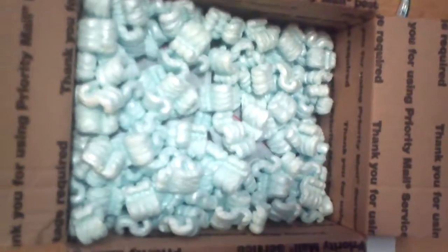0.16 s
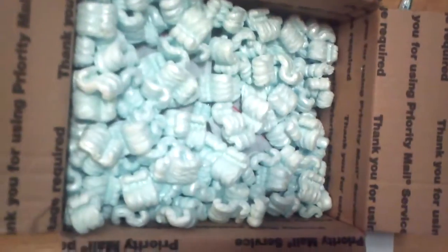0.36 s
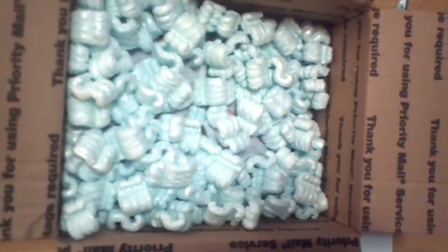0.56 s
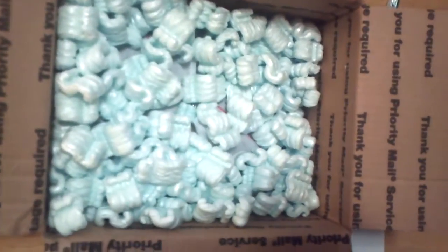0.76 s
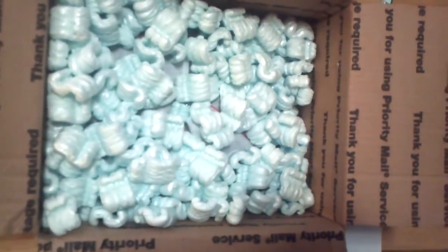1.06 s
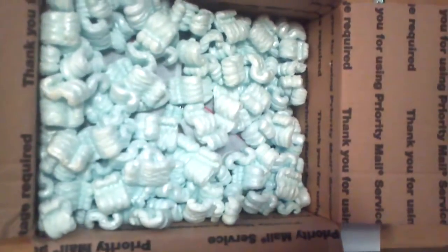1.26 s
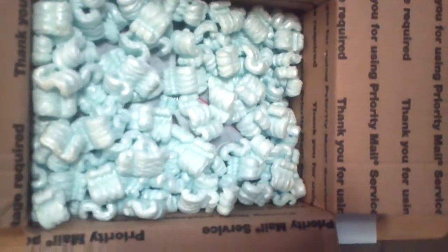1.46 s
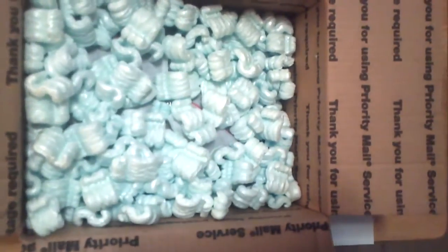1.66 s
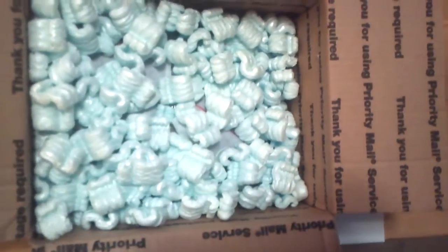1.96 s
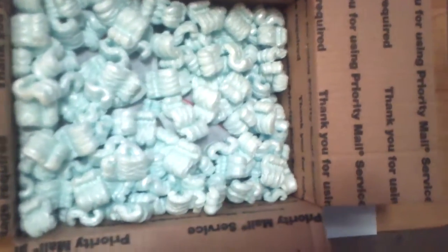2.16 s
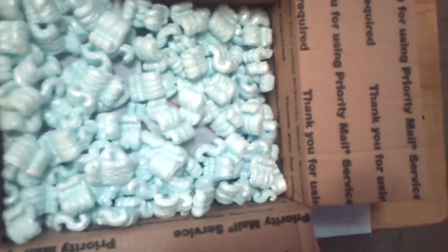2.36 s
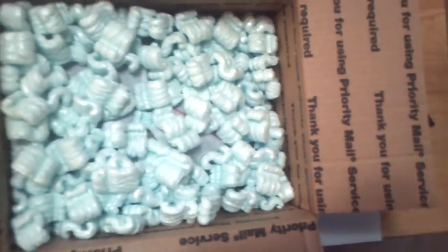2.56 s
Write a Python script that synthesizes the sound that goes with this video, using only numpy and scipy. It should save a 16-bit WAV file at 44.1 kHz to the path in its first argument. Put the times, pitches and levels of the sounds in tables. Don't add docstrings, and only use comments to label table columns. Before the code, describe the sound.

Foam packing peanuts rustle in a cardboard box: a faint start, a loud crackling swell with a dull knock, then smaller uneven shuffles and ticks, more box bumps near the end; close stereo microphone, quiet room.

```python
import sys
import numpy as np
from scipy import signal
from scipy.fft import rfft, irfft, next_fast_len
from scipy.io import wavfile
from scipy.ndimage import uniform_filter1d

SR = 44100
rng = np.random.default_rng(int(sys.argv[2]) if len(sys.argv) > 2 else 0)


def pcm_store(signal):
    levels = np.round(np.clip(np.atleast_2d(signal), -1, 1) * 32767)
    wavfile.write(sys.argv[1], SR, levels.astype(np.int16).T)


def how_loud(loudness_db):
    steps = np.asarray(loudness_db, float) / 20
    return 10 ** steps


N = 119070

# [start_s, rise_s, hold_s, level_db, release_t60_s]
PUSHES = [(0, 0.00027, 0.033, -53.5, 0.17), (0.184, 0.073, 0.006, -51, 0.045),
          (0.275, 0.046, 0.14, -36, 0.16), (0.454, .005, 0.054, -64, 0.43),
          (0.492, 0.0073, 0.1, -46.5, 0.48), (0.696, 0.021, 0.036, -54.5, 0.12),
          (0.776, 0.013, 0.086, -75, 0.058), (0.874, 0.0012, 0.046, -46, 0.095),
          (0.94, 0.044, 0.063, -50, 0.09), (1.137, 0.0078, 0.029, -51.5, 0.12),
          (1.168, 0.016, 0.024, -46.5, 0.1), (1.31, 0.033, 0.037, -60, 0.073),
          (1.485, 0.013, 0.04, -47, 0.42), (1.57, 0.0089, 0.17, -46.5, 0.21),
          (1.857, 0.00086, 0.059, -49.5, 0.32), (1.963, 0.0087, 0.047, -50.5, 0.067),
          (2.042, 0.003, 0.035, -50, 0.15), (2.125, 0.0031, 0.01, -49, 0.14),
          (2.175, 0.04, 0.027, -43.5, 0.17), (2.328, 0.0092, 0.095, -47.5, 0.59)]
# [time_s, level_db]
SETTLING = [
    (0.0, -61.5),
    (0.25, -62.5),
    (0.44, -48),
    (0.65, -55.5),
    (1.42, -56),
    (1.68, -60),
    (2.29, -50),
    (2.54, -70),
    (2.7, -64),
]
# [start_s, rise_s, hold_s, level_db, release_t60_s]
BRUSHES = [
    (0.238, 0.0065, 0.01, -38, 0.02),
    (0.51, 0.0039, 0.014, -50, .04),
    (0.545, 0.011, 0.036, -44, 0.18),
]
# [pitch_hz, level_db per Hz]
FOAM_TONE = [(150, -16.5), (400, 5.5), (1000, -8), (3000, -0.5), (6000, -5), (10000, 1.5), (13000, -1.5),
             (16000, 0.5)]
# [pitch_hz, level_db per Hz]
BRUSH_TONE = [(1000, -52), (5000, -9.5), (9000, 4), (16000, 1.5)]
# [pitch_hz, width_octaves]
SLIP_BANDS = [(2500, 1.4), (6000, 0.99), (11000, 0.74)]
# [time_s, peak_db, pitch_hz]
SNAPS = [(0.0323, -40, 7040), (0.1955, -41, 9630), (0.2453, -30, 9790), (0.2922, -31, 9490),
         (0.3007, -28, 9710), (0.3194, -26, 9850), (0.3284, -25, 10000), (0.3444, -28, 12000),
         (0.3734, -28, 9660), (0.386, -23, 9830), (0.4234, -30, 12100), (0.4404, -23, 8900),
         (0.4439, -22, 3550), (0.5018, -31, 9660), (0.5164, -34, 10200), (0.5242, -30, 5260),
         (0.5482, -26, 7500), (0.5654, -31, 7550), (0.6394, -40, 12200), (0.7044, -42, 10400),
         (0.7168, -40, 12200), (0.7824, -45, 10400), (0.7911, -38, 9080), (0.8064, -39, 9450),
         (0.8314, -46, 9810), (0.8445, -41, 9000), (0.8724, -35, 7290), (0.9044, -36, 7240),
         (0.9124, -38, 3020), (1.0016, -36, 3370), (1.0054, -36, 9690), (1.0104, -36, 7340),
         (1.0254, -36, 7260), (1.0374, -38, 4450), (1.0914, -48, 7340), (1.1074, -32, 9230),
         (1.1468, -38, 9970), (1.1777, -38, 9290), (1.1974, -37, 9780), (1.2124, -35, 3260),
         (1.264, -36, 11800), (1.2714, -36, 10300),
         (1.3409, -45, 9960), (1.3678, -41, 9520), (1.3844, -41, 7240), (1.3944, -45, 6520),
              (1.4681, -37, 7180), (1.4755, -36, 9120), (1.502, -34, 9950), (1.5504, -25, 9710),
              (1.5713, -37, 3410), (1.6344, -35, 9570), (1.6701, -35, 7280), (1.7464, -28, 10000),
              (1.7544, -39, 7510), (1.8652, -34, 6310), (1.8804, -35, 9660), (1.8864, -39, 9010),
              (1.9194, -38, 6510), (1.9454, -42, 7480), (1.9814, -37, 3380), (1.9884, -36, 7610),
              (2.0024, -35, 4700), (2.0158, -32, 9000), (2.0428, -32, 7460), (2.0474, -37, 9840),
              (2.0604, -38, 10000), (2.0804, -39, 3680), (2.1266, -36, 11700), (2.1385, -34, 9980),
              (2.1525, -35, 10200), (2.2484, -33, 4420), (2.3351, -37, 9710), (2.3894, -34, 3690),
              (2.589, -48, 9610), (2.6259, -41, 4650)]
# [time_s, peak_db, pitch_hz, contact_s]
KNOCKS = [(0.275, -46.5, 465, 0.0052), (0.33, -50.5, 567, 0.014), (0.36, -56.5, 554, 0.009),
          (0.445, -27.5, 553, 0.0026), (.468, -66, 550, 0.0056), (0.9, -43.5, 500, 0.011),
          (0.919, -50, 436, 0.01), (1.516, -46, 390, 0.0097), (1.532, -46.5, 446, 0.021),
          (1.595, -48, 546, 0.014), (1.72, -38.5, 930, 0.0048), (1.727, -64, 1430, 0.0081),
          (1.922, -45, 457, 0.0059), (1.579, -41.5, 835, 0.0031), (1.713, -39.5, 870, 0.002),
          (1.906, -44.5, 440, 0.0066), (2.062, -46, 1070, 0.011), (2.152, -43.5, 600, 0.017),
          (2.188, -44, 336, 0.0065), (2.257, -41.5, 655, 0.046), (2.272, -39, 147, 0.0079),
          (2.333, -47, 635, 0.006), (2.357, -40, 646, 0.02), (2.387, -39, 600, 0.0024),
          (2.288, -50.5, 414, 0.0088), (2.356, -42, 393, 0.0068), (2.39, -31.5, 432, 0.01),
          (2.458, -58, 484, 0.0044), (2.4, -37, 405, 0.0032), (2.417, -40, 308, 0.0045),
          (2.427, -36.5, 460, 0.0097), (2.625, -52, 1190, 0.0069)]
# [peak_db, pitch_hz, contact_s]
FLEXES = [(-25, 940, 0.0055), (-32, 1660, 0.053), (-35.5, 274, 0.005), (-38, 352, 0.015),
          (-38, 52.6, 0.0051), (-40.5, 146, 0.02), (-41.5, 370, 0.028), (-48.5, 1400, 0.009),
          (-48, 1030, 0.0092), (-42, 1060, .01), (-43.5, 1050, .015), (-43, 466, .005)]
FLEX_TIMES = [.444, .452, .444, 2.265, 2.407, 2.427, 2.365, 2.446, 2.22, .478, .505, 1.713]
# [pitch_hz, width_hz, level_db]
WALL_MODES = [(97.5, 44, 7), (144, 55, 9), (397, 180, -1), (673, 87, -6), (900, 235, -11.5),
              (1386, 170, -2), (1770, 420, -3.5)]
# [pitch_hz, t60_s]
ROOM_DECAY = [(200, 0.12), (1500, 0.2), (10000, 0.029)]
# [pitch_hz, level_db per Hz]
AIR_TONE = [(25, -9.5), (100, 13), (400, 3.5), (1000, -6.5), (4000, -5), (10000, -33), (16000, -33)]
# [pitch_hz, share]
ALIKE = [(200, 0.587), (700, 0.86), (1300, 0.69), (3000, 0.79), (4800, 0.66), (6500, 0.25)]
# [pitch_hz, share]
LEADING = [(4500, 0.37), (6500, 0.26), (10000, 0.66), (15000, 0.79)]
# [pitch_hz, level_db]
SHADE = [(200, -1), (500, -2), (1200, 1), (4500, 0), (6500, -2), (10000, -6), (15000, -5)]
OFFSET = [
    [.00165],
    [-.00247],
]

SLIPS_PER_S, SLIP_RISE_S, SLIP_T60_S = 600, .0002, .004
SLIP_SCATTER_DB, SLIP_TOP_DB = 5, 8
SMOOTH_DB = -1
SNAP_DB, SNAP_T60_S, SNAP_OCTAVES, SNAP_SPIKE = 5, .007, 1.1, 4
KNOCK_DB, KNOCK_OCTAVES, KNOCK_SPIKE = .5, .6, 12
KNOCK_SHADE_DB = -4.5
ROOM_DB, AIR_DB = -9, -61.5
FOAM_LAG_S, WALL_LAG_S, ROOM_LAG_S, AIR_LAG_S = .00038, .00024, .0002, -.00014
EARLY_LEAD_S = .000363
CROSS_LAG, CROSS_GAIN = 16, 1
TOP_HZ, ABOVE_TOP_DB = 15750, -55
SHARP_DB = 9
DRIFT_DB, DRIFT_HZ = -80.5, 51


def unit(x):
    return x / np.sqrt(np.mean(x ** 2) + 1e-20)


def along(points, hz):
    f, v = np.transpose(points)
    return np.interp(np.log(hz + 1), np.log(f + 1), v)


def filtered(x, response):
    n = x.shape[-1]
    m = next_fast_len(n + 2048)
    spectrum = rfft(x, m) * response(np.fft.rfftfreq(m, 1 / SR))
    return irfft(spectrum, m)[..., :n]


def toned(x, tone):
    return filtered(x, lambda hz: how_loud(along(tone, hz)))


def hump(hz, centre_hz, octaves):
    return np.exp(-.5 * (np.log2((hz + 1) / centre_hz) / octaves) ** 2)


def ringing(hz, centre_hz, width_hz):
    damping = 1j * hz * width_hz
    return damping / (centre_hz ** 2 - hz ** 2 + damping)


def swell(rows, t):
    power = 0
    for start, rise, hold, db, t60 in rows:
        attack = np.clip((t - start) / rise, 0, 1) ** 0.7
        since_release = np.clip(t - start - rise - hold, 0, None)
        power = power + (attack * how_loud(db - 60 * since_release / t60)) ** 2
    return power


def foam_slips():
    t = np.arange(1500) / SR
    puff = how_loud(-60 * t / SLIP_T60_S) * (1 - np.exp(-t / SLIP_RISE_S))
    out = how_loud(SMOOTH_DB) * rng.standard_normal((2, N))
    for centre, width in SLIP_BANDS:
        size_db = np.minimum(SLIP_SCATTER_DB * rng.exponential(size=N), SLIP_TOP_DB)
        happens = rng.random(N) < SLIPS_PER_S / SR / len(SLIP_BANDS)
        envelope = unit(signal.fftconvolve(happens * how_loud(size_db), puff)[:N])
        slips = envelope * rng.standard_normal((2, N))
        out += filtered(slips, lambda hz: hump(hz, centre, width))
    return out


def rustle():
    t = np.arange(N) / SR
    slips = foam_slips()
    creep_db = np.interp(t, *np.transpose(SETTLING))
    pushed = np.sqrt(swell(PUSHES, t) + how_loud(2 * creep_db))
    brushed = np.sqrt(swell(BRUSHES, t))
    return pushed * unit(toned(slips, FOAM_TONE)) + brushed * unit(toned(slips[:, ::-1], BRUSH_TONE))


def bursts(rows, octaves, spike, colour):
    out, t, lead = np.zeros((2, N + SR)), np.arange(4096) / SR, 1000
    noise = rng.standard_normal((len(rows), 2, 4096))
    for (s, db, centre, t60), pair in zip(rows, noise):
        envelope = how_loud(-60 * t / t60) * (1 - np.exp(-t / (t60 / 15)))
        strike = np.pad(pair * envelope + spike * (t == 0), ((0, 0), (lead, 0)))
        puff = filtered(strike, lambda hz: ringing(hz, centre, octaves * centre) ** 2 * colour(hz))
        at = round((s - 1 / centre) * SR) - lead
        out[:, at:at + puff.shape[1]] += how_loud(db) * puff / np.abs(puff).max(axis=1, keepdims=True)
    return out[:, :N]


def snaps():
    rows = [(s, db + SNAP_DB, hz, SNAP_T60_S) for s, db, hz in SNAPS]
    return bursts(rows, SNAP_OCTAVES, SNAP_SPIKE, lambda hz: how_loud(along(FOAM_TONE, hz)))


def wall_response(hz):
    return sum((-1) ** k * how_loud(db) * ringing(hz, centre, width)
               for k, (centre, width, db) in enumerate(WALL_MODES))


def knocks():
    contacts = KNOCKS + [(s, *flex) for s, flex in zip(FLEX_TIMES, FLEXES)]
    rows = [(s, db + KNOCK_DB, hz, 3 * contact) for s, db, hz, contact in contacts]
    return bursts(rows, KNOCK_OCTAVES, KNOCK_SPIKE, wall_response)


def room(x):
    hz, t, z = signal.stft(rng.standard_normal((2, SR // 2)), SR, nperseg=256)
    decay = how_loud(-60 * t / along(ROOM_DECAY, hz)[:, None])
    tail = signal.istft(z * decay, SR, nperseg=256)[1]
    delayed = np.pad(x, ((0, 0), (200, 0)))
    return signal.fftconvolve(delayed, tail / np.linalg.norm(tail[0]), axes=1)[:, :N]


def room_air():
    return how_loud(AIR_DB) * unit(toned(rng.standard_normal((2, N)), AIR_TONE))


def ports(pair, lag_s, shade_db):
    def to_far(hz):
        late = np.clip(along(ALIKE, hz), 0, .95)
        early = np.clip(along(LEADING, hz), 0, .8)
        shared = (late * np.exp(-2j * np.pi * hz * lag_s)
                  + early * np.exp(2j * np.pi * hz * EARLY_LEAD_S))
        own = np.sqrt(np.abs(1 - late ** 2 - early ** 2))
        return how_loud(along(SHADE, hz) + shade_db) * np.array([shared, own])

    return np.array([pair[0], filtered(pair, to_far).sum(0)])


def scene():
    foam = rustle() + snaps()
    wall = knocks()
    air = room_air()
    answer = how_loud(ROOM_DB) * room(foam + wall)
    return (ports(foam, FOAM_LAG_S, 0) + ports(wall, WALL_LAG_S, KNOCK_SHADE_DB)
            + ports(answer, ROOM_LAG_S, 0) + ports(air, AIR_LAG_S, 2))


def gate_top(wide):
    top = filtered(wide, lambda hz: hz >= TOP_HZ)
    power = np.mean(wide ** 2, axis=0)
    usual = uniform_filter1d(power, size=1024)
    sharp = uniform_filter1d(power, size=48) > how_loud(2 * SHARP_DB) * usual
    gate = np.clip(uniform_filter1d(128. * sharp, size=128), how_loud(ABOVE_TOP_DB), 1)
    ticks = filtered(gate * top, lambda hz: (hz >= TOP_HZ) & (hz < TOP_HZ + 1000))
    return wide - top + ticks


def electrical_drift():
    noise = rng.standard_normal((2, N))
    return how_loud(DRIFT_DB) * unit(filtered(noise, lambda hz: (hz > 12) / (1 + (hz / DRIFT_HZ) ** 2)))


def low_pass(x):
    return signal.sosfilt(signal.butter(12, 17000, fs=SR, output="sos"), x)


def record(dry):
    other_later = np.pad(dry[::-1], ((0, 0), (CROSS_LAG, 0)))[:, :N]
    wide = dry - CROSS_GAIN * other_later
    return low_pass(gate_top(wide) + OFFSET + electrical_drift())


dry = scene()
out = record(dry)
pcm_store(out)
```